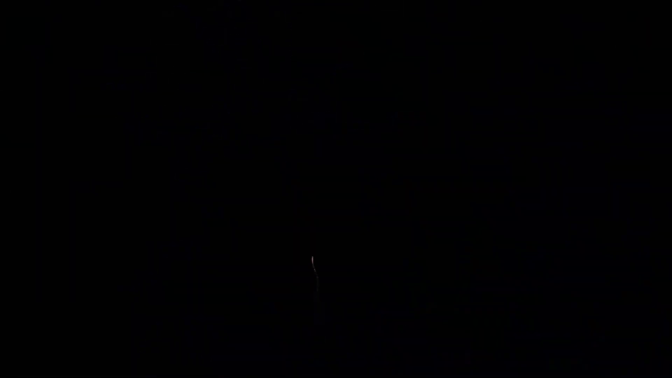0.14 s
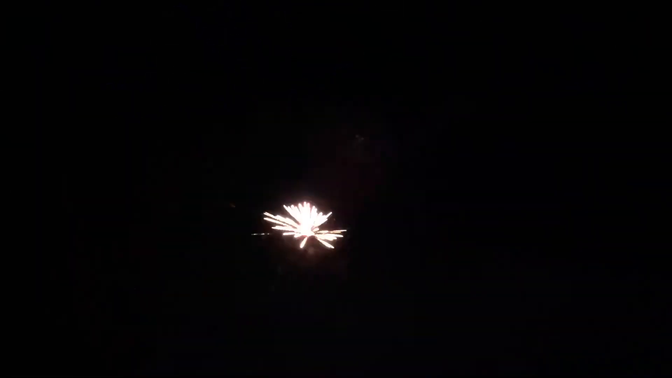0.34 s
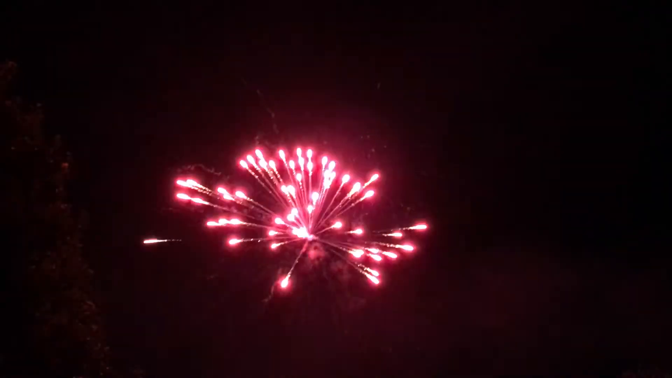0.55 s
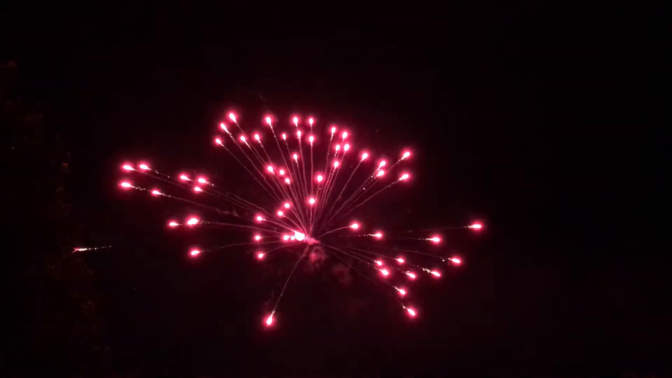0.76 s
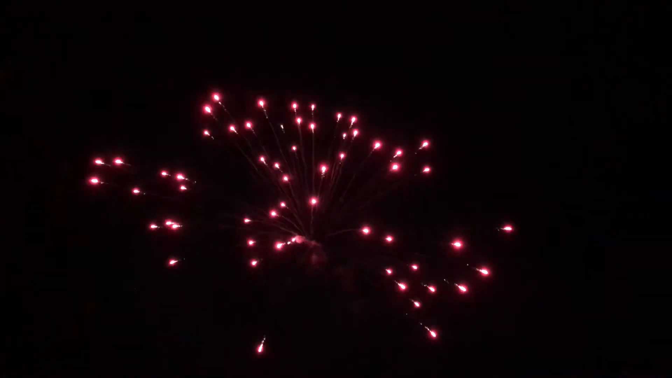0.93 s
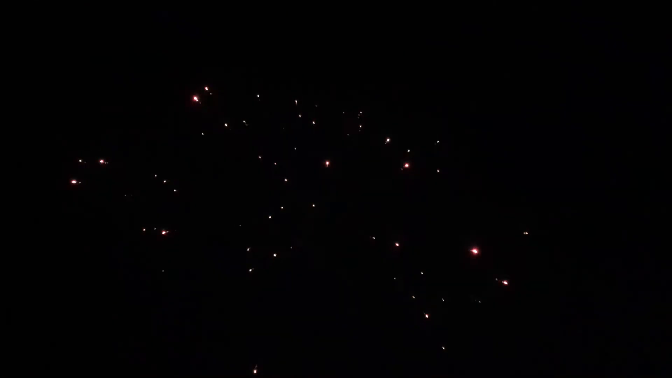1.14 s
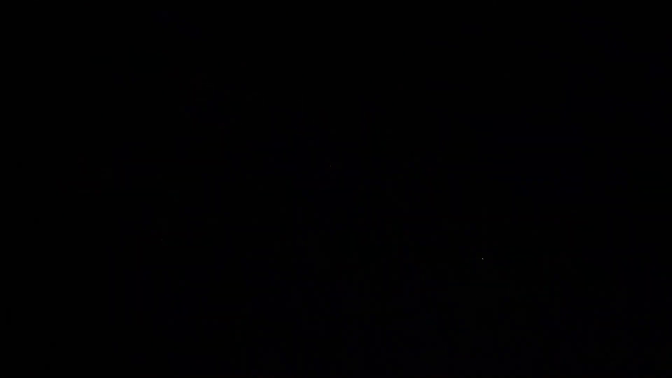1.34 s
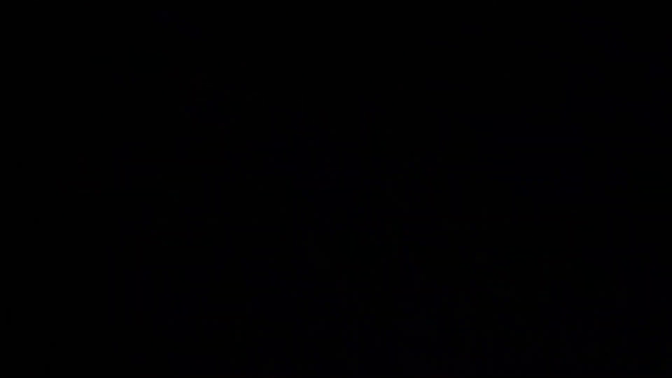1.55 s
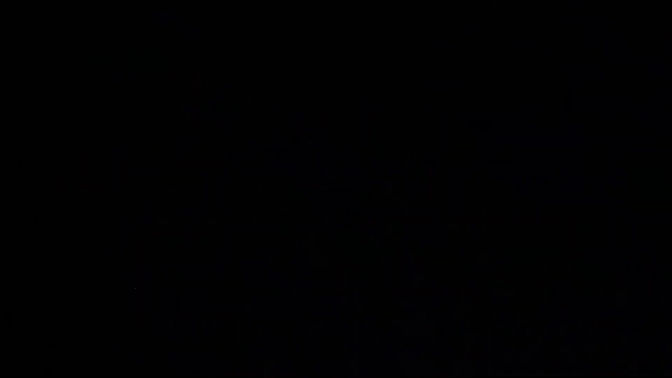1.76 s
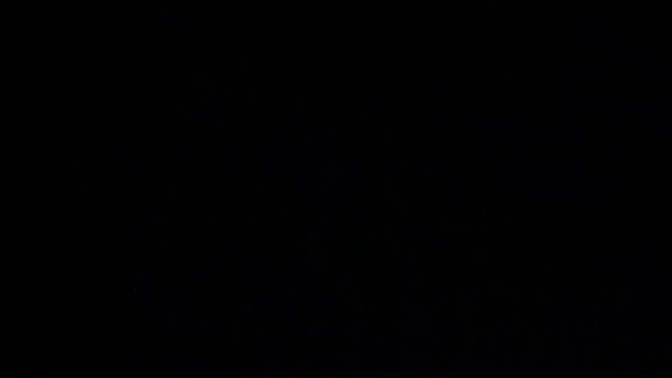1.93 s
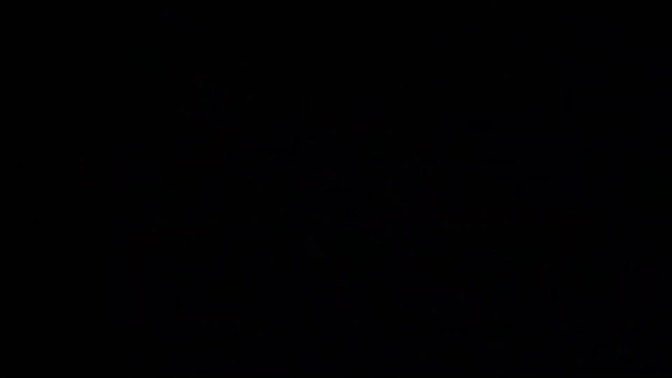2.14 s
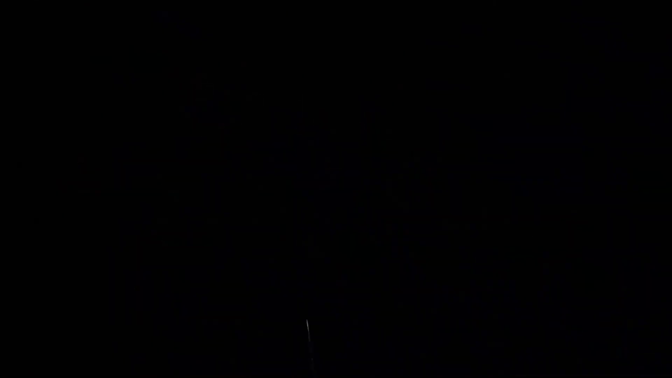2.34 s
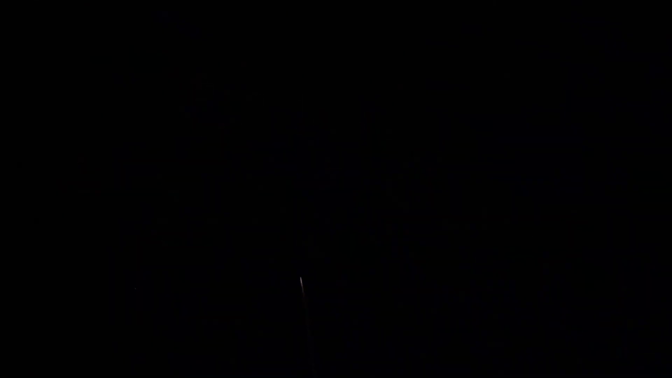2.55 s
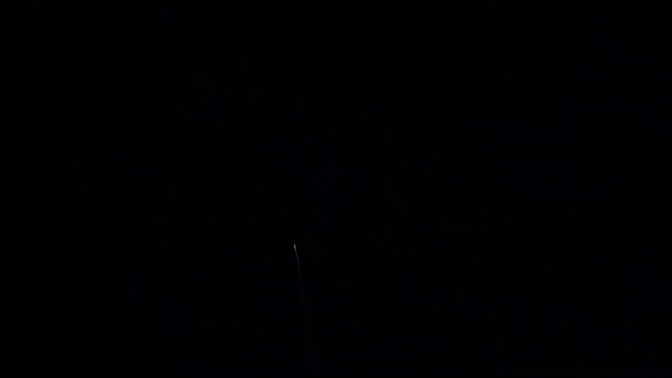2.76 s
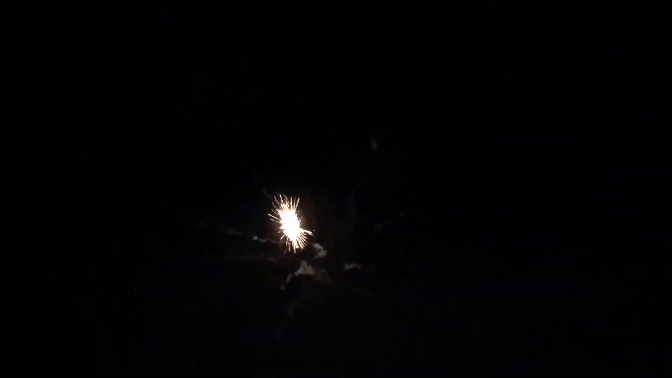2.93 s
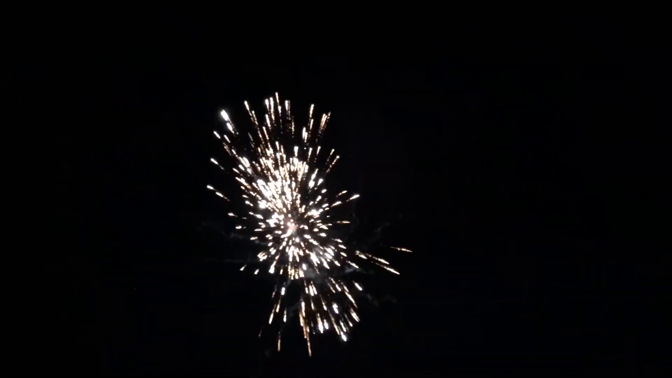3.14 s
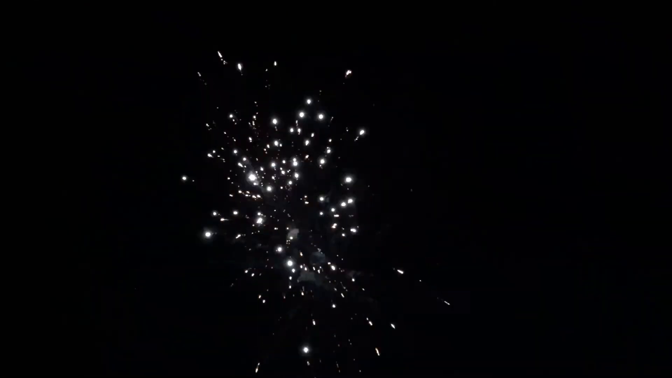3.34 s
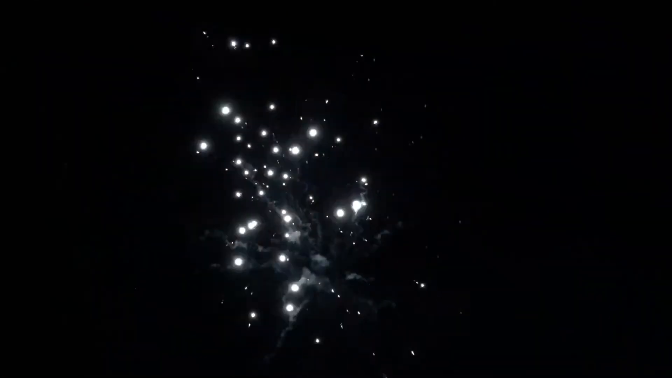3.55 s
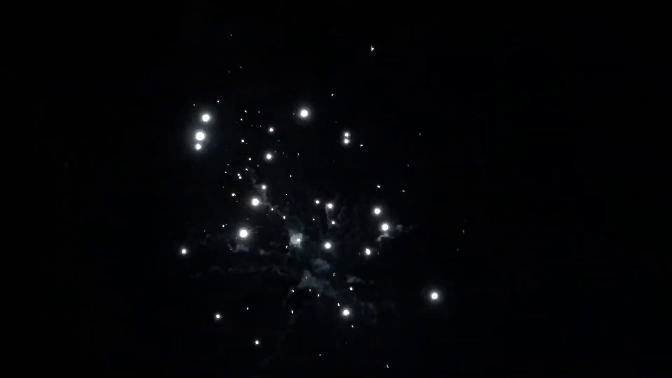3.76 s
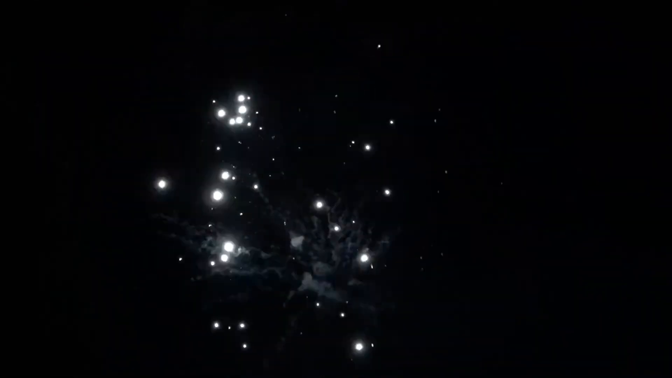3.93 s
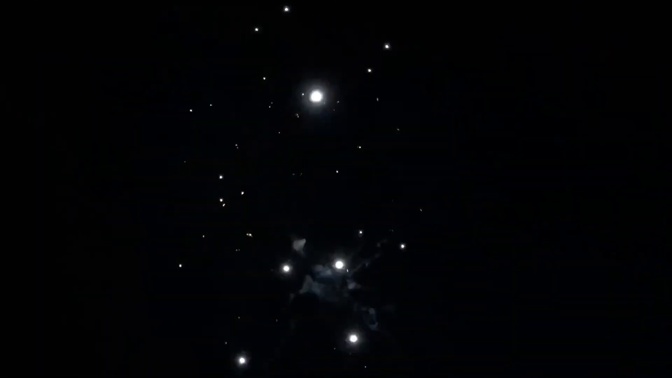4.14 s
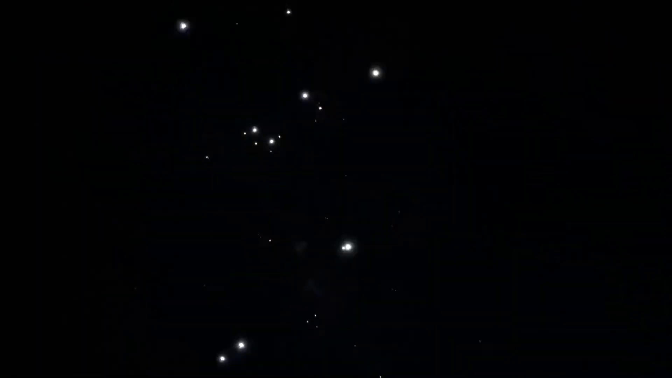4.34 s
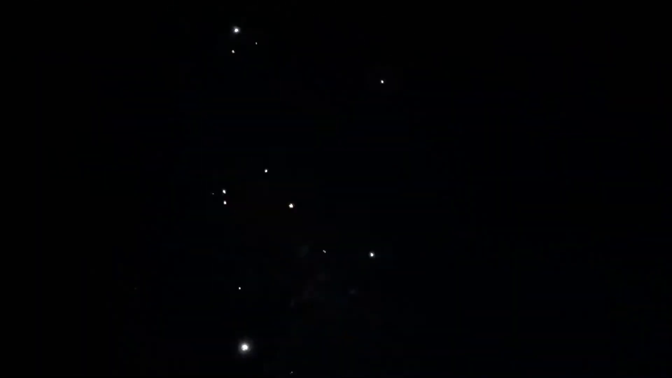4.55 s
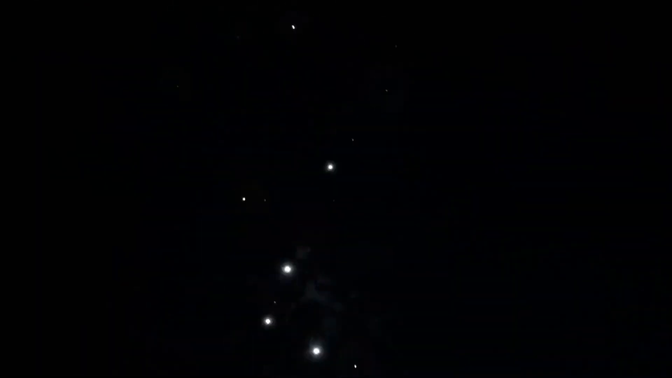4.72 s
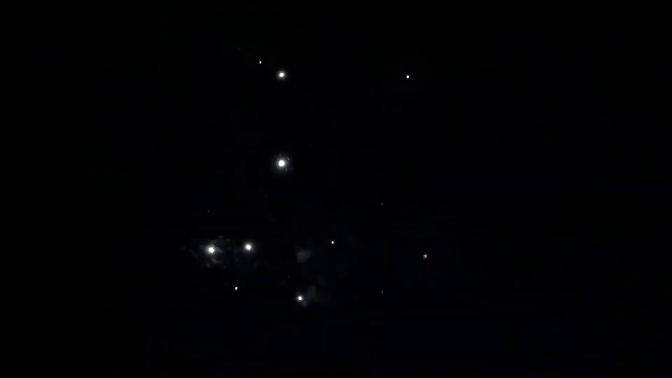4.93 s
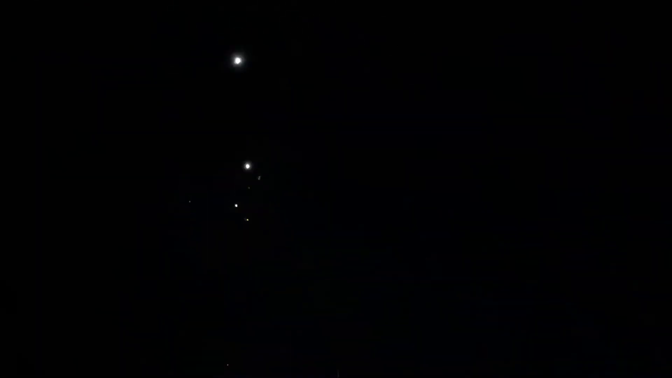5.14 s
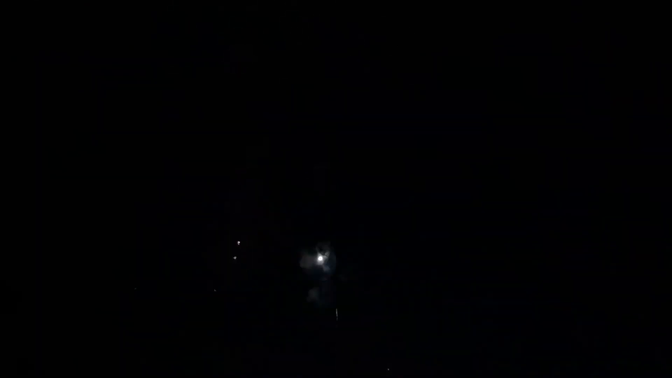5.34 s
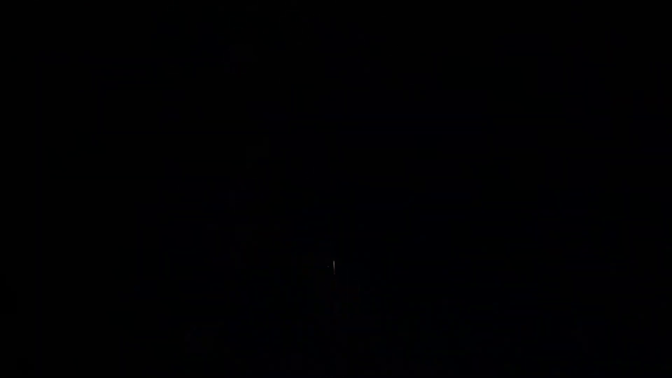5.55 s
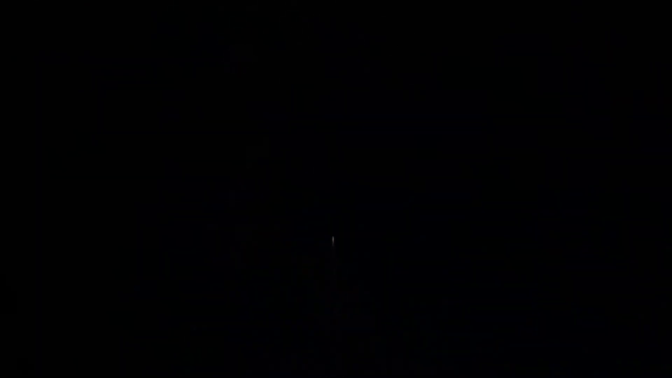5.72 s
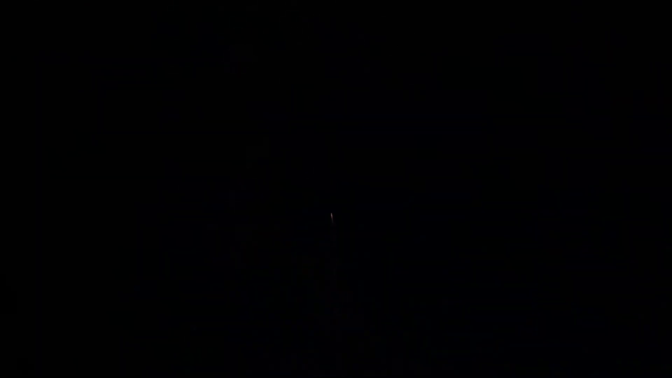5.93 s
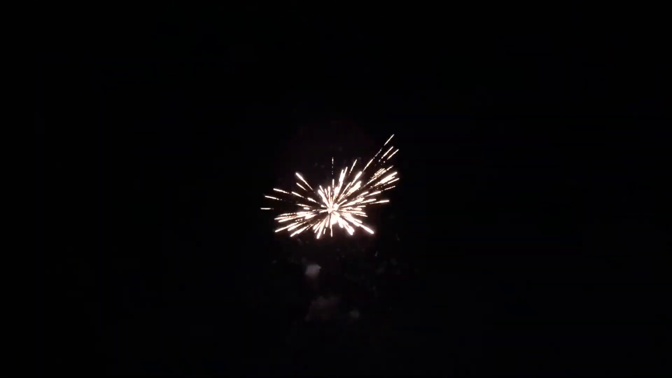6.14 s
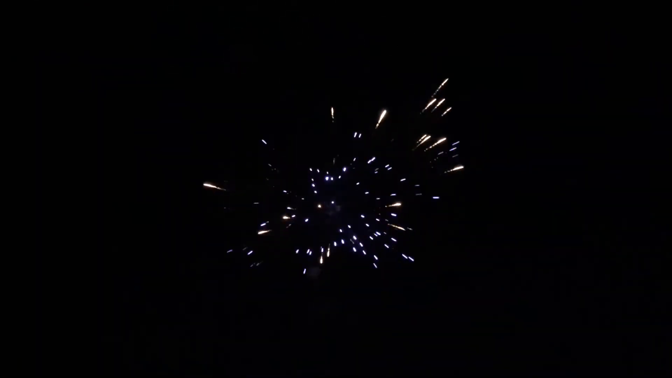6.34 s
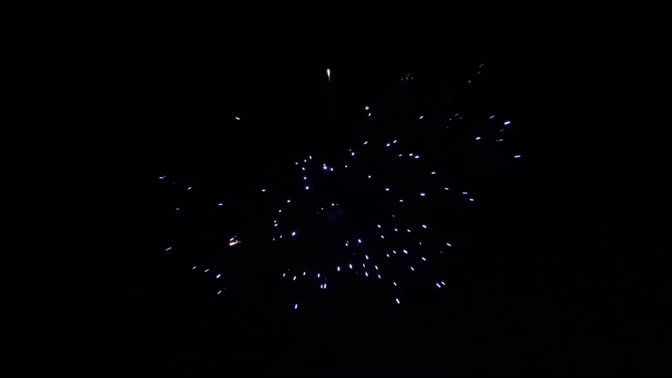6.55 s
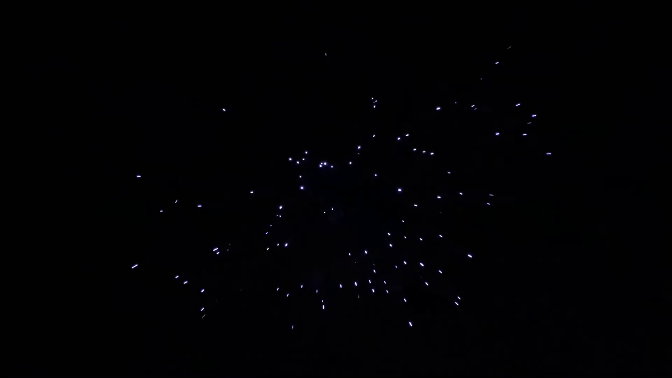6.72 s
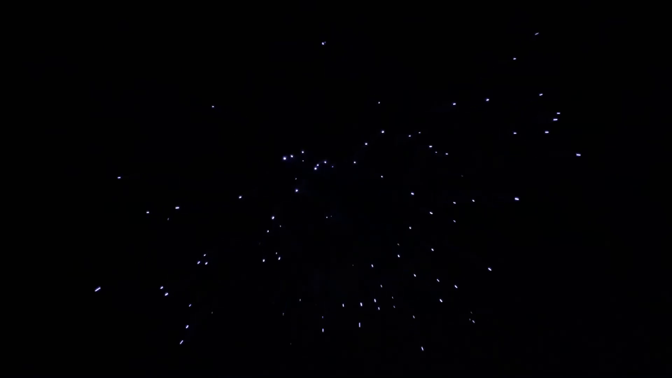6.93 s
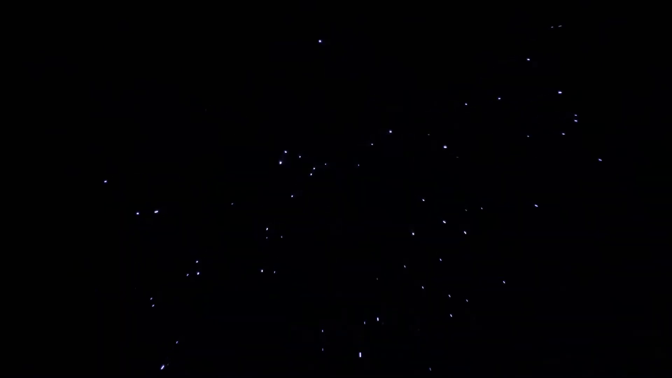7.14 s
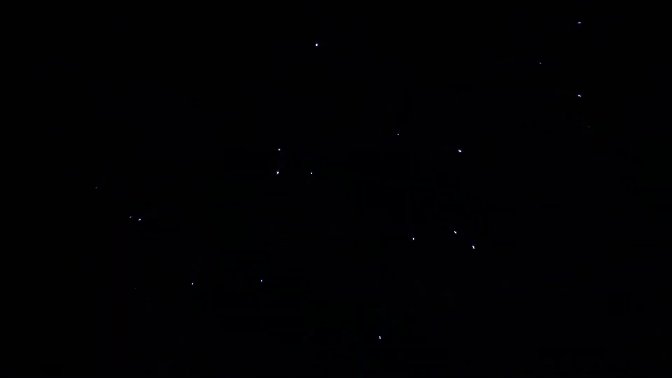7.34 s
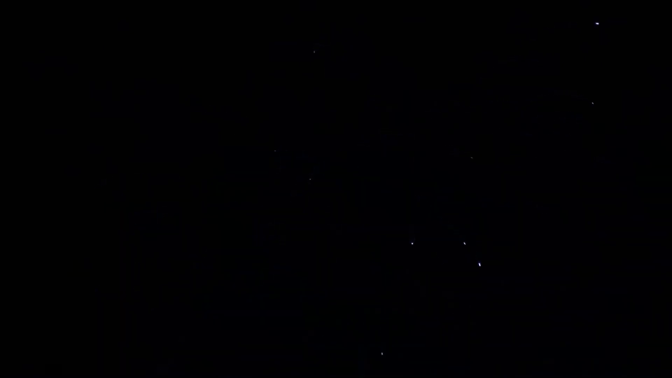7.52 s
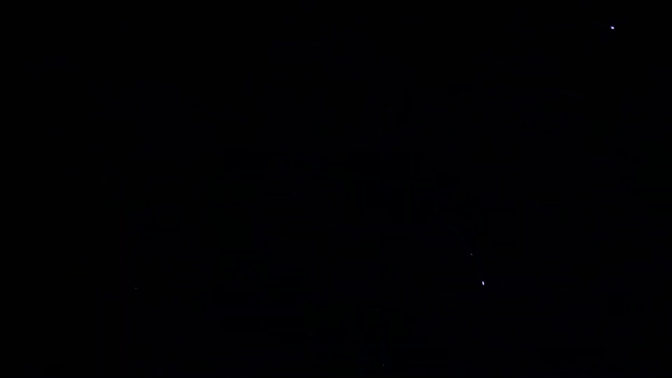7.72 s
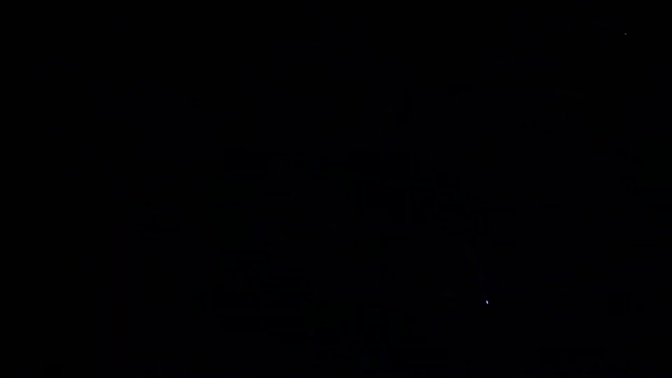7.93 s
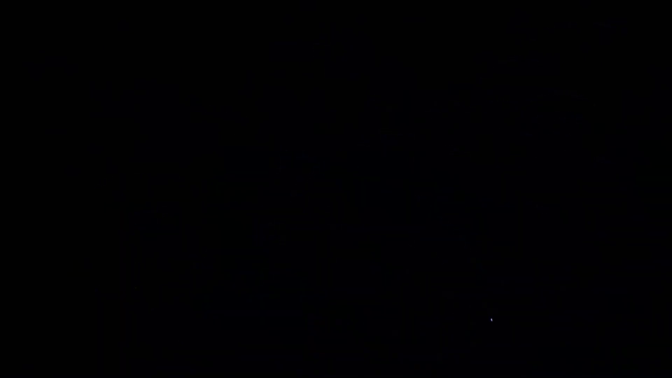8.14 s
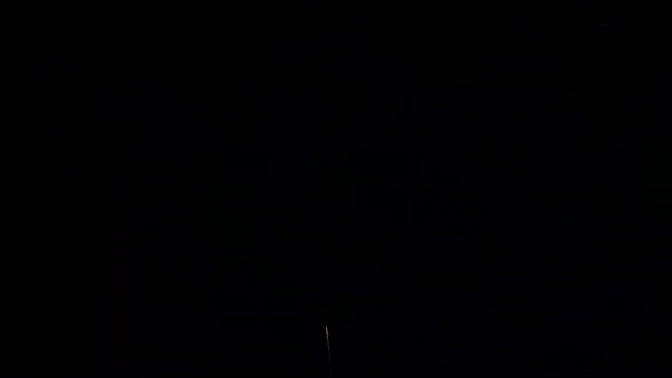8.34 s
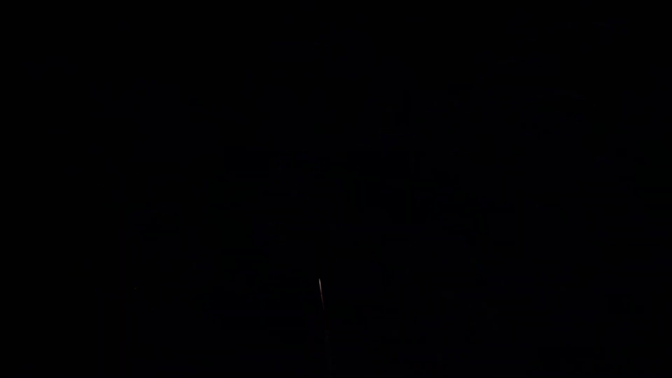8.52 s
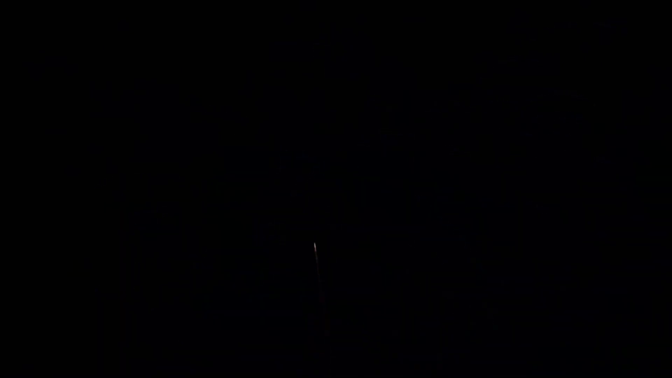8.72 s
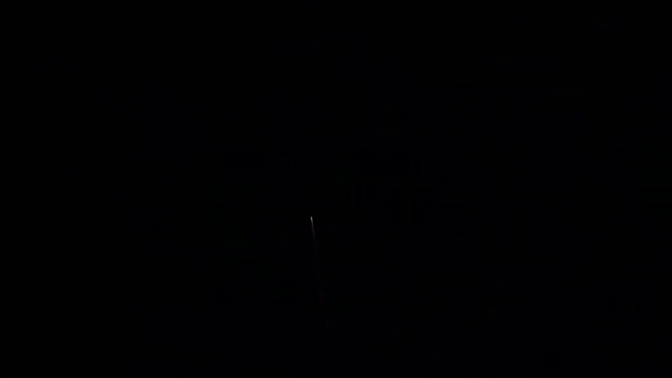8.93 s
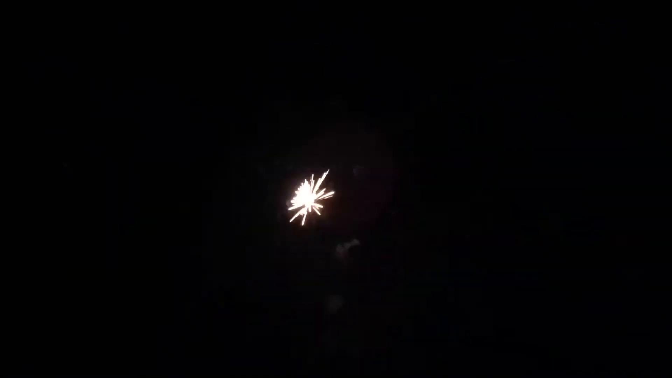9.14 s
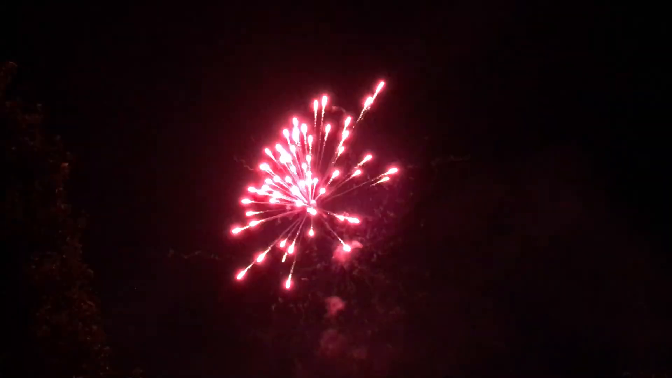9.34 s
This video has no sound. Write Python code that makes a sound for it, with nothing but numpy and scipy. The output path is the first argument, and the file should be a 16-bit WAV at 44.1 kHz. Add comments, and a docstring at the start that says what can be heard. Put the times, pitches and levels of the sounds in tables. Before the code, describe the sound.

A fireworks cake is firing outdoors among houses at night. At first a distant rumble fades under a low hush and faint crackle. At about 0.5 seconds a shell bursts overhead with a loud bang and a deep boom. More bursts follow at 3.1, 6.3 and 9.3 seconds, the second with the heaviest boom and echo. Each rings briefly off nearby walls, then returns as dull thuds and a rumble that rolls away for about three seconds. Between them, at 1.8, 4.8 and 7.8 seconds, a shell leaves its tube with a sharp, bright crack and a hollow thump, quieter and with a shorter echo. Tiny snaps dot the gaps, the clearest at 8.2 seconds. The bursts slightly overload the microphone, and everything dips for about a second after each one.

```python
"""A far rumble rolls away under the night hush and a faint crackle; then a firework bursts overhead.
A cake is firing outdoors: each shell leaves its tube with a crack and a thump, then bursts with a
shudder, a blast and a deep boom. Nearby walls ring and scatter each bang; the neighbourhood rolls it
back for three seconds, with thuds at the same delays every time. The bursts overload the recorder,
whose gain control ducks everything for about a second."""
import sys
import numpy as np
from scipy import signal
from scipy.fft import rfft, irfft
from scipy.io import wavfile
from scipy.ndimage import uniform_filter1d

SR = 44100
rng = np.random.default_rng(int(sys.argv[2]) if len(sys.argv) > 2 else 0)


def output_pcm(signal):
    """Save a mono or channel-first signal as 16-bit PCM at the path in sys.argv[1].

    Samples are clipped to [-1, 1] before scaling.
    """
    pcm = np.clip(np.atleast_2d(signal).T, -1, 1) * 32767
    wavfile.write(sys.argv[1], SR, np.round(pcm).astype(np.int16))


N = 418068
AGE = np.arange(round(1.2 * SR)) / SR  # seconds into a bang
ECHO_AGE = np.arange(round(3.2 * SR)) / SR  # seconds into its echo


def amp(db):
    """Decibels to gain."""
    return 10 ** (np.maximum(db, -300) / 20)


def curve_at(points, hz):
    """Reads a curve of (frequency [Hz], value) on a log-frequency axis."""
    freqs, values = np.transpose(points)
    return np.interp(np.log(hz + 1), np.log(freqs + 1), values)


def add(mix, at_s, sound):
    """Lays a sound into the mix; what falls outside it is dropped."""
    start = round(at_s * SR)
    sound = sound[max(-start, 0):]
    part = mix[max(start, 0):][:len(sound)]
    part += sound[:len(part)]


def noise(colour, size):
    """Noise of rms 1, shaped by an EQ curve of (frequency [Hz], level [dB])."""
    eq = amp(curve_at(colour, np.fft.rfftfreq(size, 1 / SR)))
    x = irfft(rfft(rng.standard_normal(size)) * eq, size)
    return x / x.std()


def moving_eq(x, gain_db):
    """Applies an EQ that changes over time, gain_db(hz, t)."""
    hz, t, spectrum = signal.stft(x, SR, nperseg=256)
    return signal.istft(spectrum * amp(gain_db(hz[:, None], t[None])), SR, nperseg=256)[1][:len(x)]


def lumps(size, per_s):
    """A random wobble, about 1 in size, with per_s turns a second."""
    return np.interp(np.arange(size) * per_s / SR, np.arange(4096), rng.standard_normal(4096))


def patchy(x, depth_db, across_hz=260, lasting_s=.05):
    """Sound from far away fades in and out, in patches of time and frequency."""
    hz, t, spectrum = signal.stft(x, SR, nperseg=1024)
    patches = rng.standard_normal(spectrum.shape)
    patches = uniform_filter1d(patches, round(across_hz / hz[1]), axis=0, mode="wrap")
    patches = uniform_filter1d(patches, round(lasting_s / t[1]), axis=1, mode="wrap")
    patches = 2 * np.tanh(patches / patches.std() / 2)
    # the treble is made of many more paths and stays smoother
    gain = amp(patches * depth_db / (1 + hz[:, None] / 4000))
    faded = signal.istft(spectrum * gain, SR, nperseg=1024)[1][:len(x)]
    return faded * x.std() / faded.std()


def hump(db, peak_s, rise_db_per_s, fall_db_per_s):
    """An echo's envelope: it climbs to db at peak_s after the bang, then fades."""
    past_peak = ECHO_AGE - peak_s
    return amp(db + np.minimum(rise_db_per_s * past_peak, -fall_db_per_s * past_peak))


def knocking(per_s=24, knock_s=.025, share=.33):
    """An envelope of mean power 1: part of a far echo arrives in sudden, short knocks."""
    arrivals = (rng.random(len(ECHO_AGE)) < per_s / SR) / (per_s * knock_s)
    knocks = signal.lfilter([1], [1, -np.exp(-1 / (knock_s * SR))], arrivals)
    return np.sqrt(1 - share + share * knocks)


def echo_wash(colour, envelope, air_db_per_khz_s=2.5, lumpy_db=1.5):
    """Houses and trees answer in lumps; the longer the path, the more treble the air takes."""
    wash = patchy(noise(colour, len(ECHO_AGE)), depth_db=2.5)
    wash = moving_eq(wash, lambda hz, t: -air_db_per_khz_s * hz / 1000 * np.clip(t - .22, 0, 1))
    return wash * envelope * amp(lumpy_db * lumps(len(ECHO_AGE), per_s=90.04))


def thuds(faces, colour, lumpy_db=2.5):
    """Each far face returns the bang as one thud, dulled and smeared by distance."""
    out = np.zeros(len(ECHO_AGE))
    t = AGE[:SR // 3]
    for delay, db, length, attack, tilt in faces:
        tilted = [(hz, level + tilt * np.log2(hz)) for hz, level in colour]
        thud = noise(tilted, len(t)) * amp(db + lumpy_db * lumps(len(t), per_s=180))
        add(out, delay, thud * (1 - np.exp(-t / attack)) * np.exp(-(t / length) ** 2))
    return out


# EQ of a burst's dark rumble, its wash and its thuds: (frequency [Hz], level [dB])
RUMBLE_EQ = [(18, -34), (30, -11), (64, -.5), (113, 1.5), (145, -8.5), (307, -2), (544, -1), (732, -3),
             (1240, -9), (1630, -14.5), (2140, -13.5), (4860, -34), (7000, -49), (9100, -61), (15400, -120)]
BURST_WASH_EQ = [(18, -67), (30, -16), (69, -13), (185, -3), (222, -6.5), (355, -3.5), (415, -6.5),
                 (881, -7.5), (1340, -12), (2250, -13.5), (3980, -20.5), (8250, -36), (15000, -50)]
BURST_THUD_EQ = [(30, -26), (75, -1), (140, -8), (320, 5.5), (570, 4), (900, -2.5), (1500, -9.5),
                 (3000, -23), (8000, -55)]
# far house fronts and tree lines: (delay [s], level [dB], length [s], attack [s], tilt [dB/octave])
BURST_REFLECTORS = [(.24, -21.5, .05, .005, .5), (.437, -30, .035, .002, -.5), (.495, -30, .04, .003, 0),
                    (.543, -30, .045, .006, 0), (.765, -39, .045, .003, 0), (.945, -40, .022, .003, .5),
                    (1.04, -32.5, .013, .001, 0), (1.19, -35, .03, .003, -2), (1.443, -29.5, .024, .001, 0),
                    (1.82, -39, .13, .01, -.5), (2.553, -32.5, .068, .009, -1.4)]
def burst_echo():
    """Near houses answer a burst; after a lull over open ground come far streets, then a rumble."""
    near = hump(db=-23.6, peak_s=.25, rise_db_per_s=35, fall_db_per_s=62)
    far = hump(db=-39.2, peak_s=.92, rise_db_per_s=28, fall_db_per_s=11.5)
    roll = hump(db=-37.7, peak_s=1.48, rise_db_per_s=16, fall_db_per_s=12)
    rumble = patchy(noise(RUMBLE_EQ, len(roll)), depth_db=4) * roll * knocking()
    wash = echo_wash(BURST_WASH_EQ, np.hypot(near, far))
    return rumble + wash + thuds(BURST_REFLECTORS, BURST_THUD_EQ)


# EQ of a launch's wash and its thuds: (frequency [Hz], level [dB])
LIFT_WASH_EQ = [(18, -42), (30, -19), (65, 0.5), (154, -3), (211, -8.5), (312, -5.5), (511, -8.5),
                (629, -11), (774, -12.5), (1240, -11), (1370, -13.5), (2370, -14.5), (15000, -49)]
LIFT_THUD_EQ = [(30, -28), (75, 0), (300, -3), (700, -7), (1500, -4), (3000, -9), (8000, -30), (15000, -55)]
# faces at ground level: (delay [s], level [dB], length [s], attack [s], tilt [dB/octave])
LIFT_REFLECTORS = [(.16, -34, .025, .004, 0), (.283, -37.5, .06, .006, -.8), (.61, -42, .05, .008, -2),
                   (1.245, -47, .025, .003, -.5)]
def lift_echo():
    """The nearest houses answer a launch at once, the streets behind more faintly and for longer."""
    near = hump(db=-35, peak_s=.23, rise_db_per_s=100, fall_db_per_s=50)
    far = hump(db=-50.5, peak_s=.6, rise_db_per_s=40, fall_db_per_s=17)
    return echo_wash(LIFT_WASH_EQ, np.hypot(near, far)) + thuds(LIFT_REFLECTORS, LIFT_THUD_EQ)


# EQ of the bass-heavy ambience bed: (frequency [Hz], level [dB])
NIGHT_EQ = [(12, -45), (28, -27), (45, -8), (70, 2), (120, -4.5), (200, -9), (350, -7), (550, -16),
            (800, -19.5), (1200, -16), (2000, -23), (3500, -25), (6000, -33.5), (10000, -35),
            (16000, -42.5)]
def night(db=-46):
    """The hush of the night, drifting in patches."""
    return amp(db) * patchy(noise(NIGHT_EQ, N), depth_db=4)


def crackle(per_s=25, db=-65, spread_db=3, decay_s=.003):
    """Tiny far snaps, scattered at random."""
    sizes = amp(db + spread_db * np.minimum(rng.exponential(1, N), 2))
    triggers = rng.random(N) < per_s / SR
    colour = [(300, -15), (1500, 0), (4000, -2), (7500, -6), (15000, -16)]
    snap = noise(colour, 2048) * np.exp(-AGE[:2048] / decay_s)
    return signal.oaconvolve(sizes * triggers, snap)[:N]


def first_snap(db=-36.5, decay_s=.004):
    """The small dry snap with which a shudder begins."""
    colour = [(200, -6), (900, 0), (2500, -7), (6000, -14), (15000, -26)]
    return amp(db) * noise(colour, 2048) * np.exp(-AGE[:2048] / decay_s)


def shudder(length_s=.0235, rise_db=16):
    """A dull shaking that swells just ahead of a burst's crack."""
    colour = [(25, -28), (60, 5), (130, -6), (220, 12), (380, 12.5), (600, 5), (900, -5),
              (2000, -9.5), (2800, -18.5), (4000, -35), (15000, -53)]
    t = AGE[:round(length_s * SR)]
    return noise(colour, SR)[:len(t)] * amp(rise_db * np.minimum(t / (.8 * length_s) - 1, 0))


def shock(colour):
    """A pressure spike of peak 1 with the given EQ; minimum phase keeps its attack sharp."""
    log_gain = np.log(amp(curve_at(colour, abs(np.fft.fftfreq(4096, 1 / SR)))))
    spectrum = np.exp(np.conj(signal.hilbert(log_gain)))
    spike = np.fft.ifft(spectrum).real[:2048]
    return spike / abs(spike).max()


def swell(peak_s):
    """An envelope that rises to 1 at peak_s and dies away."""
    return AGE / peak_s * np.exp(1 - AGE / peak_s)


def levelled(bang, db):
    """Scales a bang so that its loudest few milliseconds have the given level."""
    return bang * amp(db) / np.sqrt(uniform_filter1d(bang ** 2, size=200).max())


# burst cues, the first already rolling away:
# (time [s], loudest dry level [dB], boom [dB], shudder [dB], hold [s], echo [dB], echo offset [s])
BURST_CUES = [(-2.225, 10, -2, -12, .02, -1, 0), (.535, 9.5, -2, -10, 0.016, -1.2, .008),
              (3.149, 10.7, -.5, -7, 0.023, 1.3, -.002), (6.2563, 10.8, -4.5, -13.5, 0.0165, -.8, -.005),
              (9.3436, 11, -5, -16, 0.017, 0, 0)]
# EQ of the blast's body: (frequency [Hz], level [dB])
BLAST_EQ = [(25, -15.5), (55, 1), (110, 1), (165, -2), (230, 7.5), (380, 3), (650, -2.5), (800, -3),
            (1300, -5.5), (2000, -12), (4000, -19.3), (6300, -26.5), (10000, -26.5), (15500, -37)]
# its decay, band by band: (frequency [Hz], t60 [s])
BLAST_DECAY = [(100, 0.16), (400, 0.17), (1300, 0.16), (4000, .245), (8000, 0.28), (15000, 0.19)]
# ring of the nearby walls: (frequency [Hz], level [dB], t60 [s])
WALL_MODES = [(220, 2, 0.13), (242, 0, 0.1), (293, -.5, 0.15), (359, 4.5, 0.15), (390.3, -2.5, 0.15),
              (645, -13, 0.3), (672, 3.5, 0.081), (2000, -10, 0.099)]
def bursts(crack_db=-4.5, walls_db=-1, ragged_db=-1.5, ragged_per_s=450, boom_hz=61,
           gather_db=6, clump_db=1.8):
    """A shock from overhead, a dense blast of reflections, ringing walls, a deep boom and the echo."""
    out = np.zeros(N)
    spike = shock([(40, -6), (300, 0), (1500, -1), (5000, -13), (15000, -29)])
    for at_s, db, boom_db, shudder_db, hold_s, echo_db, echo_offset_s in BURST_CUES:
        # reflections gather until the blast is full, then each band dies at its own speed
        blast = moving_eq(noise(BLAST_EQ, len(AGE)),
                          lambda hz, t: -60 * np.maximum(t - hold_s, 0) / curve_at(BLAST_DECAY, hz))
        attack_db = gather_db * np.minimum(AGE / (.79 * hold_s) - 1, 0)
        blast *= amp(attack_db + clump_db * lumps(len(AGE), per_s=420))
        add(blast, 0, amp(crack_db) * spike)
        # single hard reflections swell out of the blast and make it ragged
        polarity = rng.choice([-1, 1], len(AGE))
        reflections = polarity * (rng.random(len(AGE)) < ragged_per_s / SR) * swell(peak_s=.017)
        add(blast, 0, amp(ragged_db) * signal.oaconvolve(reflections, spike))
        blast += amp(walls_db) * ring(WALL_MODES, attack_s=.0043, detune=.0054)
        boom = amp(boom_db) * swell(peak_s=.0095) * np.sin(2 * np.pi * boom_hz * AGE)
        add(out, at_s, levelled(blast + boom, db))
        add(out, at_s + echo_offset_s, amp(echo_db) * burst_echo())
        lead_in = amp(shudder_db) * shudder()
        lead_in_s = at_s - len(lead_in) / SR
        add(out, lead_in_s, lead_in)
        add(out, lead_in_s, first_snap())
    return out


def ring(modes, attack_s, detune):
    """Struck modes build up and die away, tuned a little differently at every blow."""
    out = np.zeros(len(AGE))
    for hz, db, t60 in modes:
        pitch_hz = hz * (1 + detune * rng.standard_normal())
        out += amp(db - 60 * AGE / t60) * np.sin(2 * np.pi * pitch_hz * AGE)
    return out * (1 - np.exp(-AGE / attack_s))


# faint ticks that stand out of the crackle: (time [s], level [dB])
TICK_CUES = [(1.431, -52), (2.4225, -41), (3.686, -46), (4.394, -51), (4.479, -49), (8.1824, -31),
             (8.687, -44)]
def ticks(tail_db=-15, tail_s=.017):
    """Small bright snaps, each with a short scatter."""
    out = np.zeros(N)
    colour = [(300, -18), (2000, -4), (4000, 8), (7500, 2), (11000, -7), (15000, -33)]
    for at_s, db in TICK_CUES:
        add(out, at_s, amp(db) * shock(colour))
        add(out, at_s, amp(db + tail_db) * noise(colour, len(AGE)) * np.exp(-AGE / tail_s))
    return out


# launch cues, the first shell already under way: (time [s], level [dB], echo [dB])
LIFT_CUES = [(-.955, 0, -4), (1.7518, 0.5, 0), (4.7516, 1.5, 0), (7.8298, 0.8, -1.5)]
# EQ of the bright crack and of its scatter in the yard: (frequency [Hz], level [dB])
CRACK_EQ = [(100, -38), (700, -5), (1500, 2), (2600, 3.5), (4000, -0.5), (6300, -10.5), (10000, -20),
            (15500, -24)]
YARD_EQ = [(30, -24), (80, 11), (130, 4), (300, 7), (500, -2.5), (750, -14), (1200, -3.5), (1800, -8),
           (2600, -10), (4000, -14.5), (6300, -21), (10000, -25.5), (15500, -42)]
# decay of that scatter: (frequency [Hz], t60 [s])
YARD_DECAY = [(100, 0.33), (500, 0.2), (1500, 0.42), (4000, 0.46), (8000, 0.36), (15000, 0.4)]
# tight slapbacks of the crack: (delay [s], level [dB], smear [s])
SLAPBACKS = [(0, -12.5, 0.00028), (.0019, 1, 0.0025), (.007, -29, .002), (0.016, -16, 0.0088)]
# the tube's thump and ring, and its hollow note off a wall: (frequency [Hz], level [dB], t60 [s])
TUBE_MODES = [(63, -35.5, .14), (89.5, -11, 0.12), (185, -3.5, 0.052), (215, -14, .08),
              (257.5, -16.5, 0.145), (316, -15, 0.13), (1235, -29, 0.19), (2460, -24, 0.11),
              (2640, -31, 0.16), (3345, -28, 0.17), (5950, -42, 0.09)]
HOLLOW_MODES = [(1530, -11, 0.016), (1660, -9, 0.022), (1925, -20, 0.067), (2700, -22, 0.04)]
def lifts(crack_db=-1.5, scatter_db=-18.3, thump_db=.7, slap_db=-10, hollow_db=1, wall_s=.0155):
    """The lift charge cracks and its gas thumps out of the tube; the yard scatters the shot."""
    out = np.zeros(N)
    shared_paths = noise(YARD_EQ, len(AGE))  # every shot crosses the same yard
    for at_s, db, echo_db in LIFT_CUES:
        scatter = .92 * shared_paths + .88 * noise(YARD_EQ, len(AGE))
        shot = amp(scatter_db) * moving_eq(scatter, lambda hz, t: -60 * t / curve_at(YARD_DECAY, hz))
        add(shot, 0, -amp(crack_db) * shock(CRACK_EQ))
        for delay_s, path_db, smear_s in SLAPBACKS:
            slap = noise(CRACK_EQ, len(AGE)) * np.exp(-AGE / smear_s)  # smeared by rough surfaces
            add(shot, delay_s, amp(slap_db + path_db) * slap)
        add(shot, .0008, -amp(thump_db) * ring(TUBE_MODES, attack_s=.00097, detune=.0024))
        add(shot, wall_s, amp(hollow_db) * ring(HOLLOW_MODES, attack_s=.0005, detune=.019))
        add(out, at_s, amp(db) * shot)
        add(out, at_s, amp(echo_db) * lift_echo())
    return out


def scene():
    """All sources at one microphone."""
    return (lifts() + bursts() + ticks() + crackle() + night())[None]


# bumps and dips in the microphone's tone: (frequency [Hz], width [Hz], level [dB])
MIC_EQ = [(798, 220, -3.5), (4920, 174, -2.5), (6140, 870, 3), (10470, 500, -5)]
def record(dry, threshold_db=-5, release_db_per_s=16, knee=.65, ceiling=.96, cutoff_hz=16000):
    """Microphone colour, gain control that ducks at once and recovers slowly, soft clip, low-pass."""
    hz = np.fft.rfftfreq(N, 1 / SR)
    mic_db = sum(db * np.exp(-((hz - centre) / width) ** 2) for centre, width, db in MIC_EQ)
    coloured = irfft(rfft(dry) * amp(mic_db), N)
    level_db = 10 * np.log10(abs(uniform_filter1d(coloured[0] ** 2, size=200)) + 1e-12)
    release_db = np.arange(N) / SR * release_db_per_s
    held_db = np.maximum.accumulate(level_db + release_db) - release_db
    duck_db = np.maximum(held_db - threshold_db, 0)
    duck_db = np.pad(duck_db, (70, 0))[:N]  # the gain falls just as the shock arrives
    ducked = coloured / amp(uniform_filter1d(duck_db, size=40))
    clean = np.clip(ducked, -knee, knee)
    rounded = clean + (ceiling - knee) * np.tanh((ducked - clean) / (ceiling - knee))
    low_pass = signal.firwin(511, cutoff_hz, window=("kaiser", 9), fs=SR)
    return signal.oaconvolve(rounded, low_pass[None], "same")


dry = scene()
out = record(dry)
output_pcm(out)
```